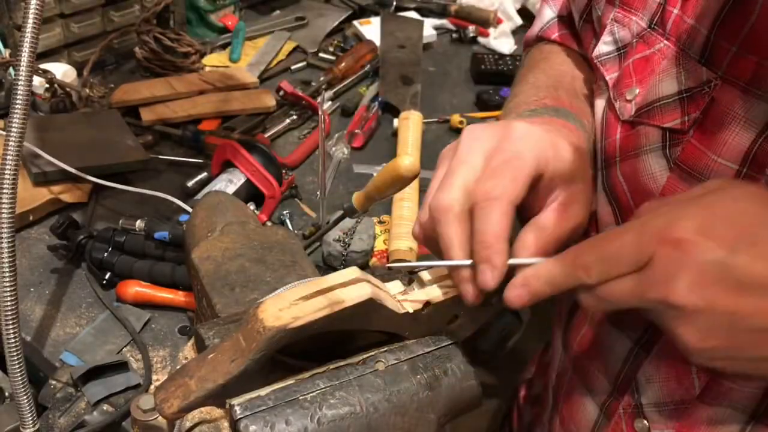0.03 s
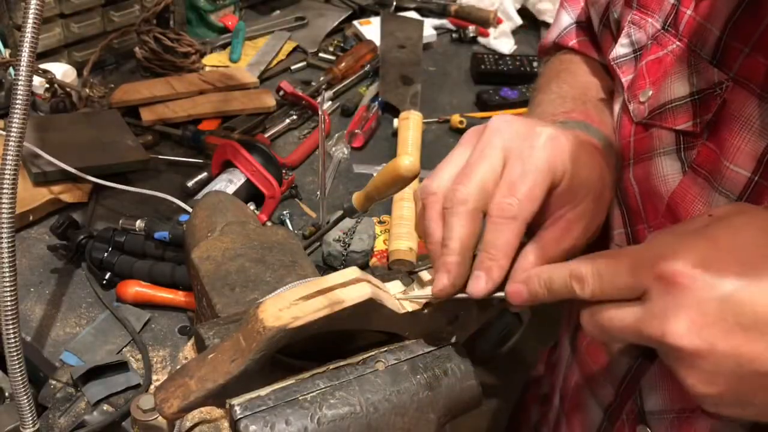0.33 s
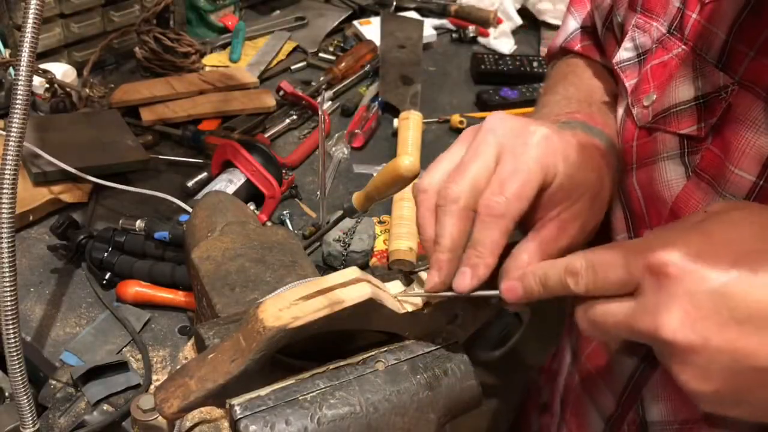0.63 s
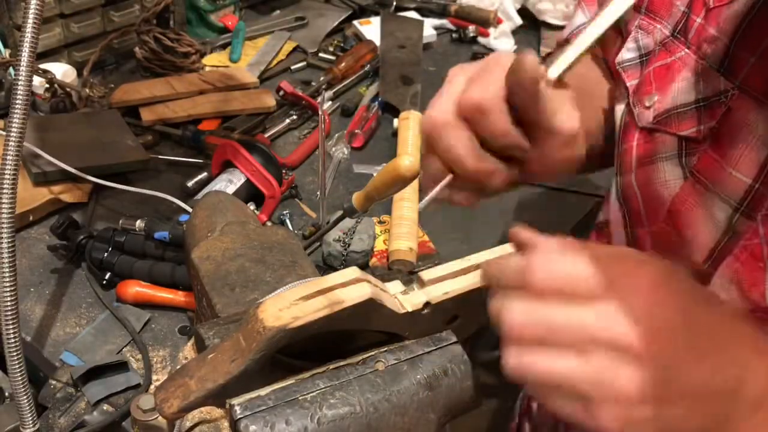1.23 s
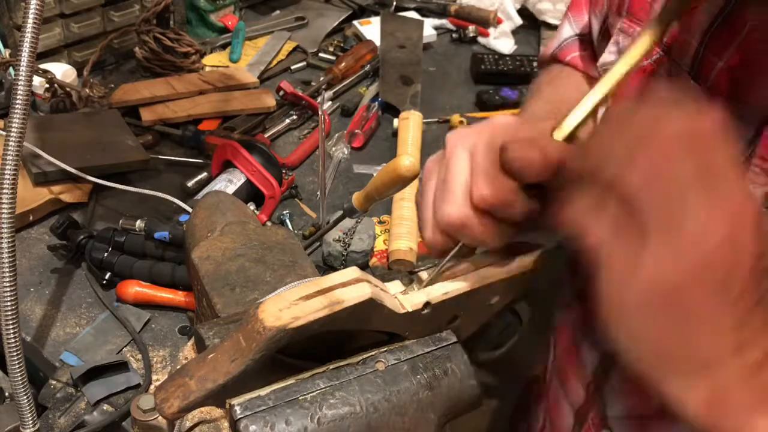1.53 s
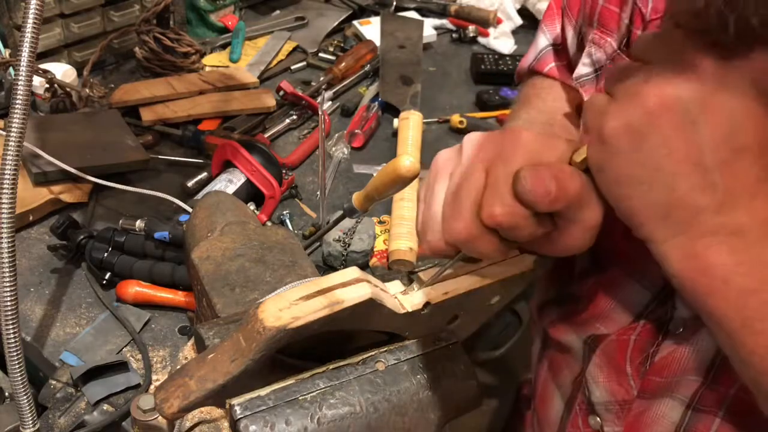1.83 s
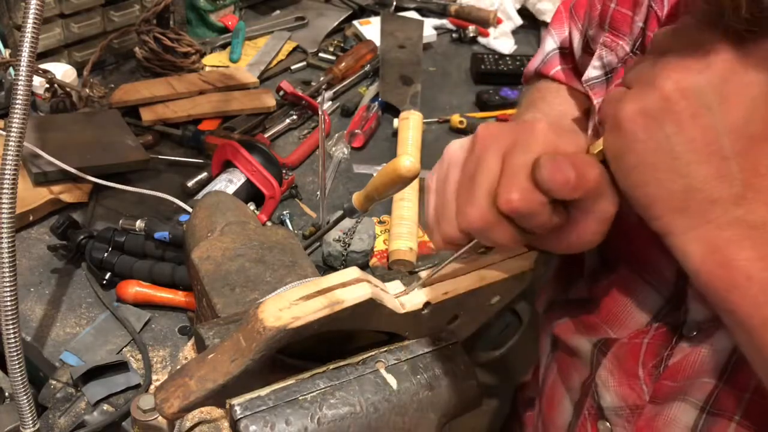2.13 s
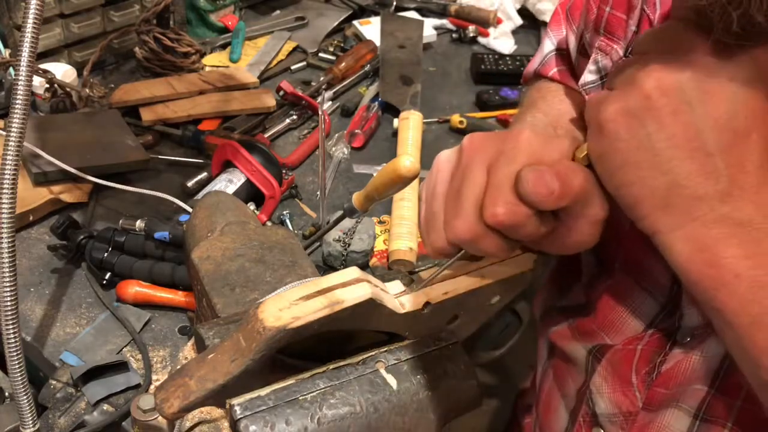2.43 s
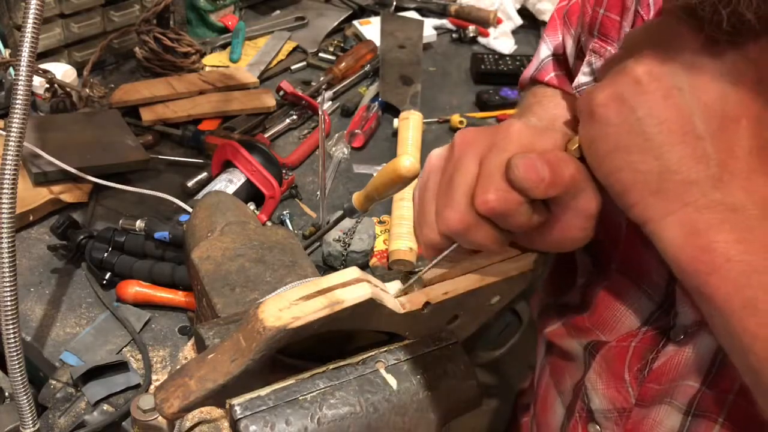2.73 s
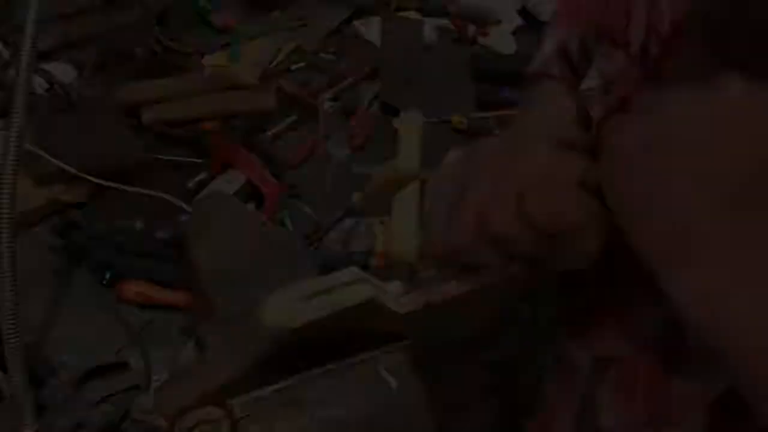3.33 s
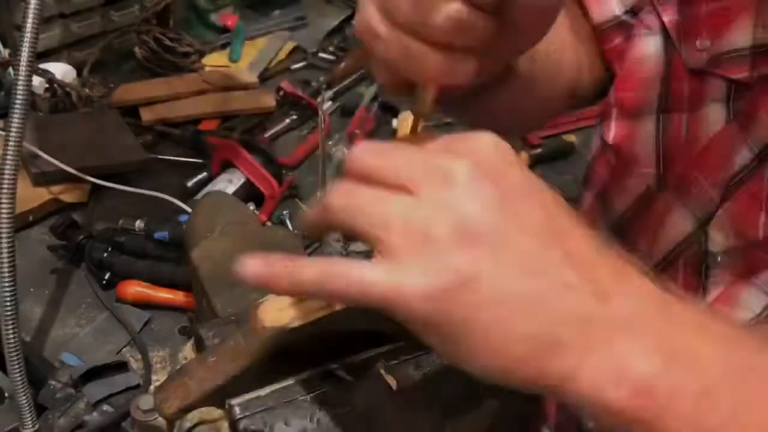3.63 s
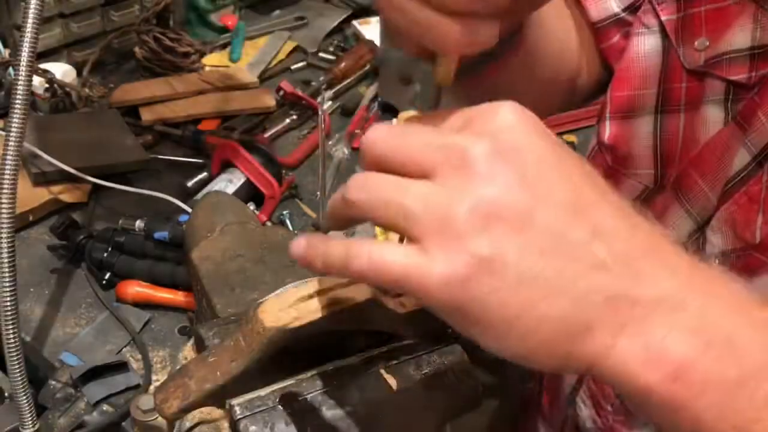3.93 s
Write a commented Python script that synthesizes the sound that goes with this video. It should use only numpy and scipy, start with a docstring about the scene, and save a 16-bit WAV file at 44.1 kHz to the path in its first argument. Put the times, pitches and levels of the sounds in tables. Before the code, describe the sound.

Close scraping of a thin blade paring old wood, with tiny squeaks and three crisp crunches as chips break away. A faint hum in the small workshop drops out just before a ringing clack and a few light taps.

```python
"""A slim steel blade pares the recess of an old wooden handle clamped in a vise, close by.
It scratches and three times breaks a chip loose, the first two after a louder rasp.
Snapping fibres and friction make the noise, and the steel rings or squeaks.
Behind it are a mains hum and the air of a small workshop. The level dips briefly and the hum is gone;
then a hard piece clacks against the handle and is nudged about."""
import sys
import numpy as np
from scipy import signal
from scipy.fft import rfft, irfft
from scipy.io import wavfile
from scipy.ndimage import uniform_filter1d

SR = 44100
rng = np.random.default_rng(int(sys.argv[2]) if len(sys.argv) > 2 else 0)


def log_audio(samples):
    """Write samples as a 16-bit WAV file to the path given in sys.argv[1]."""
    # one column per channel
    frames = np.atleast_2d(samples).T
    # limit to full scale, then quantise
    limited = np.clip(frames, -1, 1)
    pcm = np.round(limited * 32767).astype(np.int16)
    wavfile.write(sys.argv[1], SR, pcm)


N = 176400
TIME = np.arange(N) / SR
FREQS = np.maximum(np.arange(N // 2 + 1) * SR / N, 1)


def from_db(db):
    """Turn decibels into a gain."""
    return 10 ** (np.asarray(db) / 20)

def rms_one(x):
    """Scale a sound to an average strength (rms) of 1."""
    return x / np.sqrt(np.mean(x ** 2) + 1e-20)

def drift(rate_hz):
    """A smooth random wobble, mostly slower than rate_hz."""
    return rms_one(irfft(rfft(rng.standard_normal(N)) / (1 + (FREQS / rate_hz) ** 2), N))

def coloured(x, colour):
    """Filter x by a tone colour, a list of (f/Hz, level/dB) that falls away past its ends; rms 1."""
    hz, db = np.transpose(sorted(colour))
    ends = np.minimum(FREQS / hz[0], 1) ** 2 * np.minimum(hz[-1] / FREQS, 1) ** 2
    gain = from_db(np.interp(np.log(FREQS), np.log(hz), db))
    return rms_one(irfft(rfft(x) * ends * gain, N))

def fade(share):
    """A smooth ramp from silence at 0 to full level at 1."""
    return np.sin(np.pi / 2 * np.clip(share, 0, 1)) ** 2

def swell(t, db, rise, fall, rounding_s=0.0023):
    """The sound swells to a peak at time t and dies away, about 20 dB over the rise and fall time."""
    away = (np.hypot(TIME - t, rounding_s) - rounding_s) / np.where(TIME < t, rise, fall)
    return from_db(db - 20 * np.clip(away, 0, 10) ** 1.116)

def grain(cracks_per_s=9000, spread_db=1.5, friction_share=0.57, catch_db=1.15):
    """Tiny cracks of snapping fibres among smooth friction; the edge catches unevenly."""
    sizes = from_db(spread_db * np.minimum(rng.exponential(1, N), 4)) * rng.choice([-1, 1], N)
    cracks = rms_one(sizes * (rng.random(N) < cracks_per_s / SR))
    friction = rng.standard_normal(N)
    mix = np.sqrt(1 - friction_share) * cracks + np.sqrt(friction_share) * friction
    return mix * from_db(catch_db * drift(rate_hz=210))

def crunch(loudness, colour):
    """A burst of cracks drives all frequencies evenly, and the struck body colours it."""
    burst = rfft(loudness * grain())
    power = uniform_filter1d(np.abs(burst) ** 2, size=1100)
    even_burst = irfft(burst / np.sqrt(np.abs(power) + 1e-20), N)
    return np.sqrt(np.mean(loudness ** 2)) * coloured(even_burst, colour)

def tone(hz, width_hz):
    """One ringing tone; the contact jostles its pitch over a small width."""
    jostled_hz = hz + width_hz / 2 * drift(width_hz)
    return np.sqrt(2) * np.sin(2 * np.pi * np.cumsum(jostled_hz) / SR)

def ringing(tones):
    """All the tones of one body together; rms 1."""
    return rms_one(sum(from_db(db) * tone(hz, width) for hz, width, db in tones))


# tones of the hum: multiple of the mains frequency, level/dB
HUM_TONES = [(1, -47), (4, -67.5), (5, -69), (6, -63), (7, -77), (9, -67), (11, -76.5), (15, -82),
             (18, -81.5)]
def hum(mains_hz=59.15):
    """The mains hums; its overtones waver more than its lowest tone."""
    out = np.zeros(N)
    for multiple, db in HUM_TONES:
        waver_db = (0.2 if multiple == 1 else 1.0) * drift(rate_hz=1.9)
        phase = 2 * np.pi * (multiple * mains_hz * TIME + rng.random())
        out += from_db(db + waver_db) * np.sqrt(2) * np.sin(phase)
    return out

# colours of the air before and after the dip: f/Hz, level/dB
AIR_BEFORE = [(20, -23), (35, 1.5), (80, 5), (140, -1), (200, 0.5), (270, -6.5), (450, -9.5), (700, -13),
              (1100, -16.5), (1600, -23), (2500, -27.5), (5000, -32), (15500, -36)]
AIR_AFTER = [(20, -24), (40, 4), (100, 3.5), (200, 0), (280, -10), (400, -7), (600, -17), (1000, -16),
             (1600, -24.5), (3000, -31.5), (15500, -37)]
def background(dip_s=3.374, fade_out_s=0.052, fade_in_s=0.041):
    """Hum and workshop air; after a brief dip only air is left."""
    early = hum() + from_db(-59) * coloured(rng.standard_normal(N), AIR_BEFORE)
    late = from_db(-57.5) * coloured(rng.standard_normal(N), AIR_AFTER)
    early *= fade(0.1 + (dip_s - TIME) / fade_out_s)
    late *= fade(0.1 + (TIME - dip_s) / fade_in_s)
    return early + late

def room_echo(x, decay_s=0.21, damping_hz=4000, level_db=-18.5):
    """The cluttered room scatters the sound into a short, dull tail."""
    pole = np.exp(-2 * np.pi * damping_hz / SR)
    tail = signal.lfilter([1], [1, -2 * pole, pole * pole], rng.standard_normal(SR // 2))
    tail *= from_db(-60 * TIME[:SR // 2] / decay_s)
    return from_db(level_db) * signal.fftconvolve(x, tail / np.linalg.norm(tail))[:N]

# colour of the bump: f/Hz, level/dB
BUMP_COLOUR = [(30, -8), (60, 4), (90, 5.5), (140, -0.5), (300, -29), (1000, -51)]
def arm_bump():
    """The arm shifts with a soft, low bump."""
    return swell(t=1.52, db=-52.5, rise=0.25, fall=0.25) * coloured(rng.standard_normal(N), BUMP_COLOUR)

# soft rubs: t/s, level/dB, rise/s, fall/s
HAND_RUBS = [(1.13, -65.5, 0.17, 0.17), (1.60, -63, 0.16, .12), (2.03, -62, .07, 0.051)]
# their colour: f/Hz, level/dB
RUB_COLOUR = [(1200, -10), (2800, -1), (6000, -1.5), (12500, -4), (15500, 1)]
def hands():
    """Fingers and sleeve rub as the grip changes."""
    return sum(swell(*rub) for rub in HAND_RUBS) * coloured(grain(), RUB_COLOUR)

# light taps: t/s, wood level/dB, steel level/dB, rise/s, fall/s
LIGHT_TAPS = [(2.292, -63, -74, .023, 0.03), (3.50, -68.5, -70.5, 0.038, 0.06),
              (3.817, -60.5, -65.5, 0.019, 0.028), (3.877, -62, -72, 0.025, 0.032),
              (3.96, -64, -66, 0.055, 0.028)]
# colour of the tapped wood: f/Hz, level/dB
WOOD_COLOUR = [(400, -10), (1000, 2.5), (1600, -5), (2250, 1), (2900, -5), (5400, -6), (6400, -14),
               (15500, -19)]
# tones of the tapped steel: f/Hz, width/Hz, level/dB
STEEL_TONES = [(3420, 200, -0.5), (4800, 220, -1), (5650, 160, -0.5), (7000, 150, -10)]
def taps():
    """Light taps sound the wood and set the steel ringing."""
    wood, steel = coloured(grain(), WOOD_COLOUR), ringing(STEEL_TONES)
    return sum(swell(t, 0, rise, fall) * (from_db(wood_db) * wood + from_db(steel_db) * steel)
               for t, wood_db, steel_db, rise, fall in LIGHT_TAPS)

# hits of the hard piece: t/s, ring level/dB, knock level/dB, rise/s, fall/s
CLACK_HITS = [(3.567, -51, -57, 0.012, 0.028), (3.591, -32.3, -38.5, 0.021, 0.025),
              (3.610, -36, -28, 0.022, 0.026), (3.645, -72, -58.5, 0.036, 0.055),
              (3.998, -60, -66, 0.013, .04)]
# tones that ring on each hit: f/Hz, width/Hz, level/dB
CLACK_TONES = [(2140, 90, -11), (2330, 91, -8), (2750, 140, 1.5), (3020, 220, 2), (3670, 120, 3),
               (3960, 120, 3), (4170, 47, 1), (4390, 62, 1.5), (4580, 21, -1), (4760, 29, -4),
               (5070, 35, 0), (5240, 34, 0), (5440, 25, -.5), (5750, 119, -2)]
# colours of the dull knock and the bright skid: f/Hz, level/dB
KNOCK_COLOUR = [(130, -17), (330, -20.5), (480, -6), (600, -2.5), (783, -9.5), (885, 3), (963, -9),
                (1045, 1), (1130, -8.5), (1350, -8), (1560, -17.5), (2060, -6.5), (2720, -4), (3350, -8.5),
                (4260, -6), (5620, -4.5), (6570, -13), (9280, -13.5), (10300, -18.5), (15600, -20)]
SKID_COLOUR = [(9000, -15), (13000, -6), (15500, 3)]
def clack():
    """A hard piece chatters onto the handle, rings, knocks and skids as it settles."""
    ring_loudness = sum(swell(t, db, rise, fall) for t, db, _, rise, fall in CLACK_HITS)
    knock_loudness = sum(swell(t, db, rise, fall) for t, _, db, rise, fall in CLACK_HITS)
    ring = ring_loudness * ringing(CLACK_TONES)
    knock = crunch(knock_loudness, KNOCK_COLOUR)
    skid = swell(t=3.622, db=-43, rise=0.022, fall=0.022) * coloured(grain(), SKID_COLOUR)
    return ring + knock + skid

# short rings: t/s, f/Hz, width/Hz, level/dB, rise/s, fall/s
STEEL_RINGS = [(0.83, 3400, 190, -64.5, 0.036, 0.08), (1.008, 5860, 15, -59.5, 0.016, 0.024),
               (1.004, 4880, 30, -72, .016, .025), (1.003, 10200, 35, -69, 0.014, 0.026),
               (1.398, 5400, 230, -68, .025, 0.028), (1.45, 5750, 200, -66.5, 0.018, .033),
               (3.66, 640, 60, -57, .025, 0.052), (3.6, 3450, 100, -68.5, .035, .06),
               (3.958, 3560, 260, -65, .055, .03)]
def steel_rings():
    """The blade or the vise rings briefly after a touch."""
    return sum(swell(t, db, rise, fall) * tone(hz, width)
               for t, hz, width, db, rise, fall in STEEL_RINGS)

# squeaks: t/s, f/Hz, level/dB, rise/s, fall/s
EDGE_SQUEAKS = [(0.711, 7850, -59, .07, 0.098), (1.745, 7600, -61.5, 0.025, 0.02)]
def squeaks(roughness_hz=640, sink_hz_per_s=9000):
    """The edge squeaks on the wood grain with a rough, sinking pitch."""
    out = np.zeros(N)
    for t, hz, db, rise, fall in EDGE_SQUEAKS:
        pitch_hz = hz - sink_hz_per_s * np.clip(TIME - t, -rise, fall)
        phase = 2 * np.pi * np.cumsum(pitch_hz) / SR
        rough_tone = drift(roughness_hz) * np.sin(phase) + drift(roughness_hz) * np.cos(phase)
        out += swell(t, db, rise, fall) * rough_tone
    return out

# light scratches, and the louder rasps that lead into the first two chips:
# t/s, rasp level/dB, hiss level/dB, rise/s, fall/s
BLADE_SCRATCHES = [(0.156, -67, -69, 0.02, 0.089), (0.451, -66, -68.5, 0.031, 0.035),
                   (0.625, -69.5, -72, 0.056, .05), (0.675, -72, -70, 0.03, 0.044),
                   (0.74, -61.5, -62.5, 0.057, 0.049), (0.782, -50, -66, 0.016, 0.02),
                   (0.895, -70.5, -74, .045, 0.064), (1.002, -67.5, -63, .03, 0.027),
                   (1.395, -65.5, -70, 0.016, 0.068), (1.425, -72.5, -72.5, 0.026, 0.093),
                   (1.69, -86, -71, 0.035, 0.069), (1.748, -67, -60.5, 0.023, 0.041),
                   (1.90, -41.5, -47, 0.018, .02), (2.29, -60.5, -57.5, 0.023, 0.037),
                   (2.375, -65.5, -63, 0.027, 0.027), (2.56, -69, -60.5, 0.023, 0.027),
                   (2.745, -65.5, -66, 0.042, 0.039), (2.784, -56, -57, .04, 0.036),
                   (2.843, -66, -68.5, 0.02, 0.033), (2.955, -64.5, -70, 0.023, 0.049),
                   (2.99, -76, -58.5, 0.047, 0.038), (3.154, -69, -60.5, 0.032, 0.028)]
# colours of the wood's rasp and the edge's hiss: f/Hz, level/dB
RASP_COLOUR = [(900, -4), (1600, -13), (2320, -2), (2920, -10.5), (3470, -1.5), (4200, -11.5), (4800, -3),
               (5520, 5.5), (6150, -2.5), (7000, -9), (9000, -56)]
HISS_COLOUR = [(4000, -44), (6500, -6), (7000, -4.5), (8300, -3.5), (9400, 2), (10300, -7), (11400, 1.5),
               (13000, -2), (14200, -6), (15600, -0.5)]
def scratches(vary_db=2.5, band_hz=429):
    """The wood rasps and the edge hisses; each spot touched has a slightly different colour."""
    rasp, hiss = coloured(grain(), RASP_COLOUR), coloured(grain(), HISS_COLOUR)
    bands = np.arange(0, SR / 2, band_hz)
    out = np.zeros(N)
    for t, rasp_db, hiss_db, rise, fall in BLADE_SCRATCHES:
        touch = swell(t, 0, rise, fall) * (from_db(rasp_db) * rasp + from_db(hiss_db) * hiss)
        band_db = vary_db * rng.standard_normal(256)[:len(bands)]
        tint = rms_one(from_db(np.interp(FREQS, bands, band_db)))
        out += irfft(rfft(touch) * tint, N)
    return out

# chips breaking loose: t/s, level/dB, rise/s, fall/s, colour as a list of (f/Hz, level/dB)
WOOD_CHIPS = [(0.807, -38.1, 0.037, 0.039, [(320, -25), (600, -11), (1150, -12), (1660, -21), (2300, -7),
              (2750, -18), (3420, .5), (4240, -9.5), (5600, -1.5), (6100, -11.5), (8080, -9), (9500, -3),
              (10900, -18), (12900, -6), (13900, -10), (14900, -1.5), (15600, -7.5)]),
              (1.924, -29, 0.03, 0.034, [(200, -16), (340, -14), (480, -15.5), (640, -8.5), (740, -14),
              (870, -7), (1130, -8), (1330, -11), (1650, -3.5), (1850, -7), (2100, -1), (2500, -5.5),
              (2900, -22), (3400, -2.5), (4700, -7), (5400, -0.3), (6450, -.3), (7600, -10.5), (9000, -4.5),
              (11400, -11.5), (15600, -7)]), (2.655, -33, 0.022, 0.029, [(500, -24), (1200, -15),
              (1650, -20.5), (2360, -12), (2770, -29), (3420, -5.5), (4240, -22), (4590, -12), (5330, 2.5),
              (5990, -9.5), (6660, -2.5), (8350, -11), (9100, 1.5), (9790, -12), (11000, -1), (12400, -4),
              (15600, -1)])]
def chips():
    """Fibres give way under the blade in a swelling crunch; each chip has its own colour."""
    return sum(crunch(swell(t, db, rise, fall), colour) for t, db, rise, fall, colour in WOOD_CHIPS)


def scene():
    """The work at the vise, its echo and the background, in one channel."""
    work = chips() + scratches() + steel_rings() + squeaks() + hands() + clack() + taps()
    return (work + room_echo(work) + background() + arm_bump())[None]

def record(dry, cutoff_hz=15750):
    """The highest treble is cut off steeply."""
    return irfft(rfft(dry) / np.sqrt(1 + (FREQS / cutoff_hz) ** 900), N)


dry = scene()
out = record(dry)
log_audio(out)
```